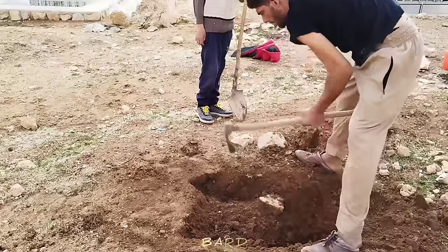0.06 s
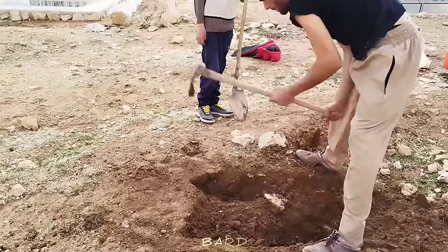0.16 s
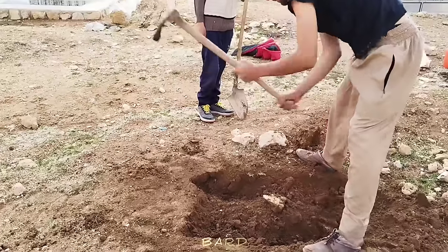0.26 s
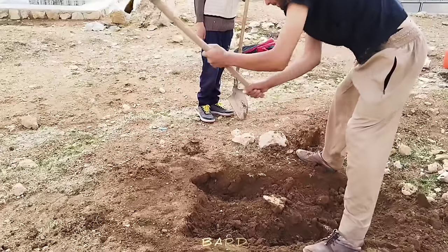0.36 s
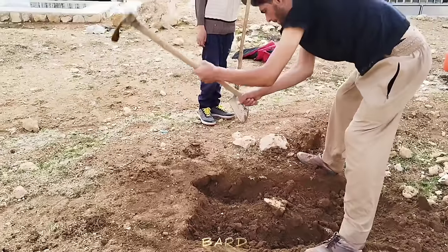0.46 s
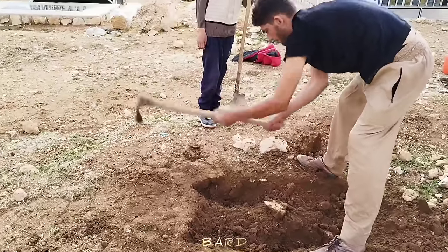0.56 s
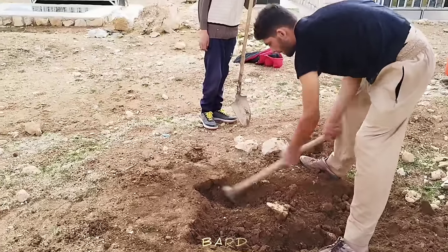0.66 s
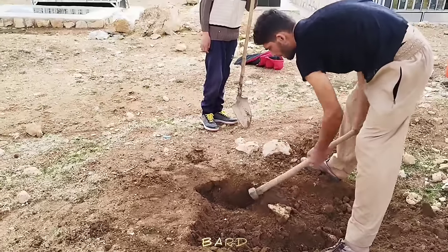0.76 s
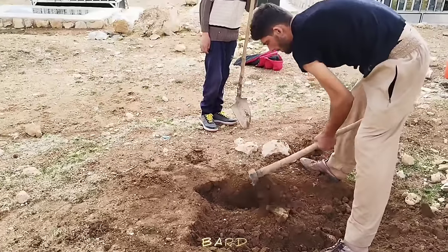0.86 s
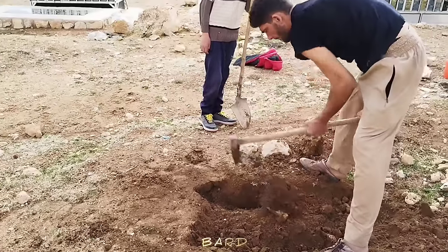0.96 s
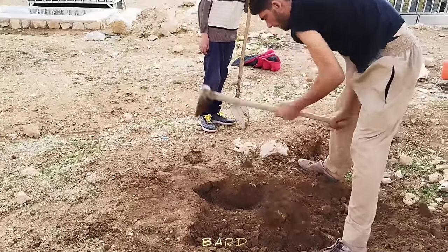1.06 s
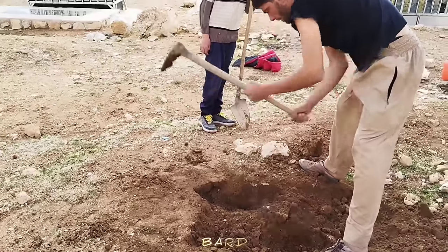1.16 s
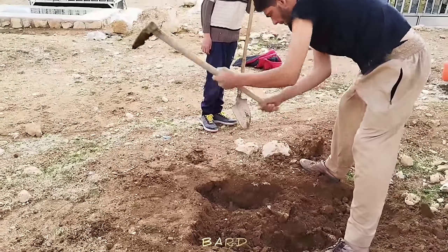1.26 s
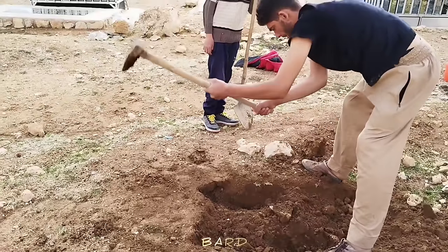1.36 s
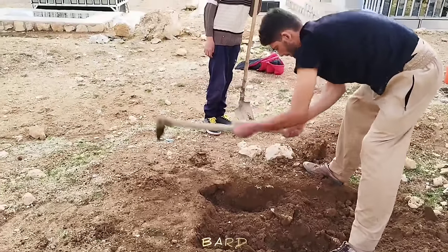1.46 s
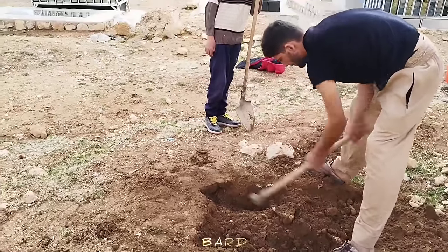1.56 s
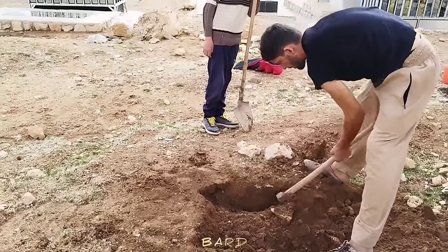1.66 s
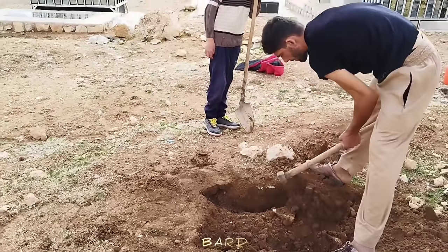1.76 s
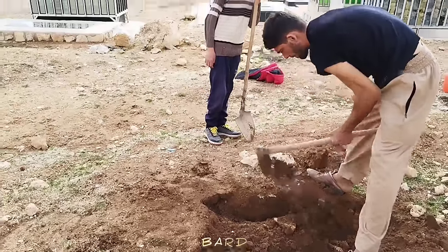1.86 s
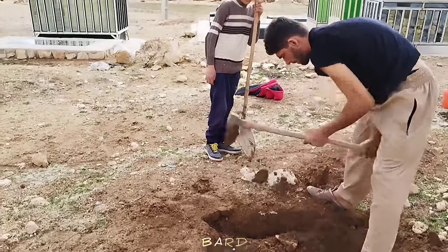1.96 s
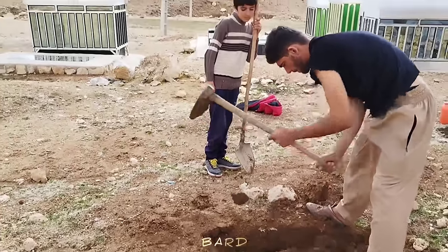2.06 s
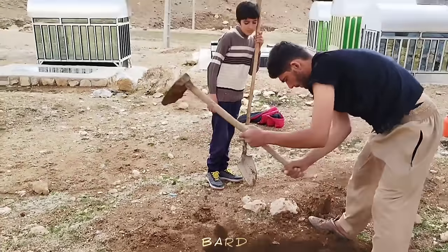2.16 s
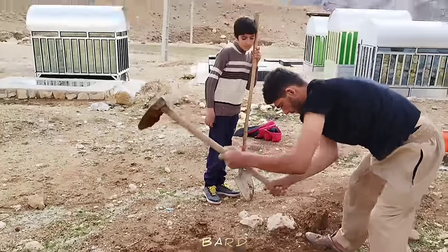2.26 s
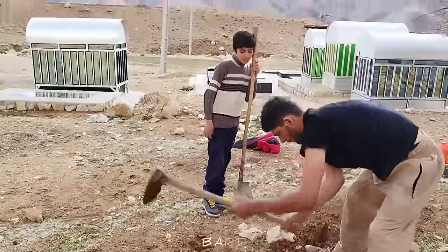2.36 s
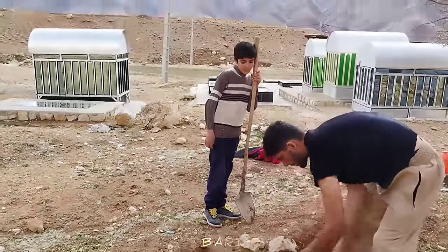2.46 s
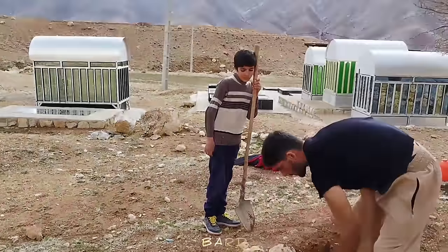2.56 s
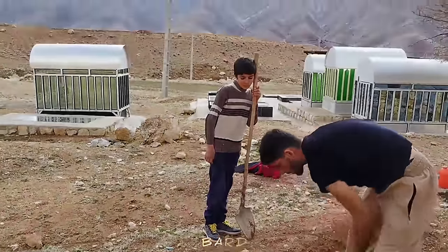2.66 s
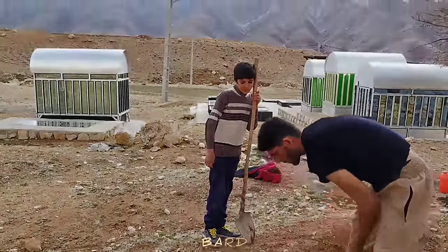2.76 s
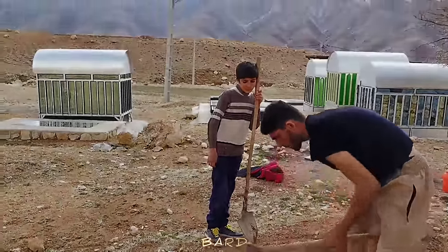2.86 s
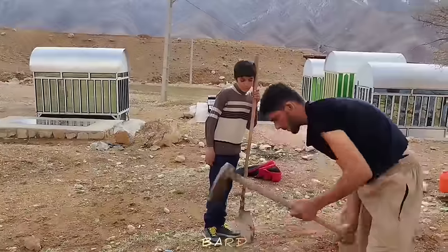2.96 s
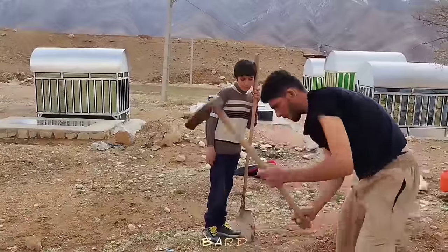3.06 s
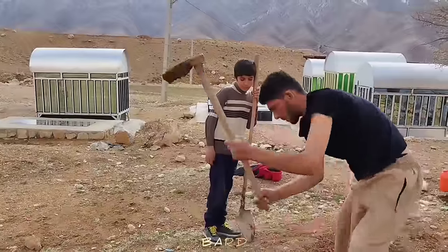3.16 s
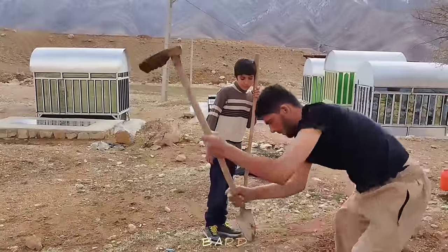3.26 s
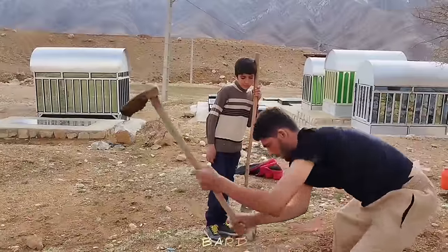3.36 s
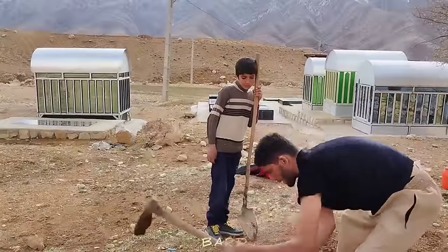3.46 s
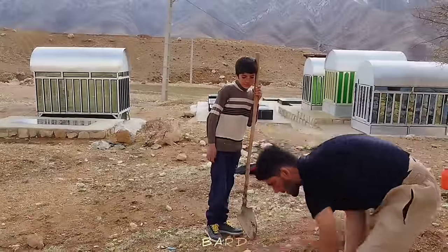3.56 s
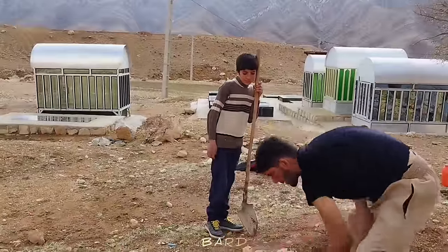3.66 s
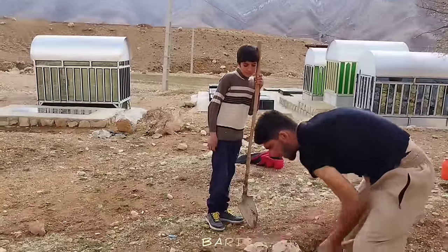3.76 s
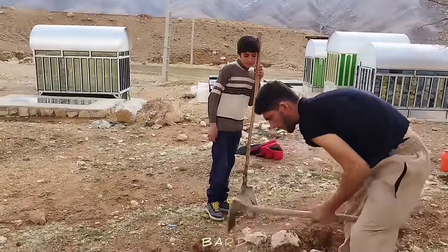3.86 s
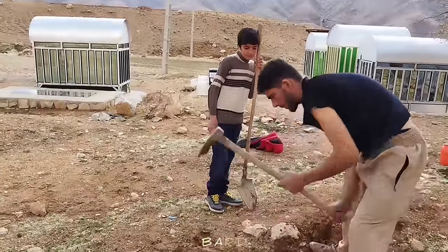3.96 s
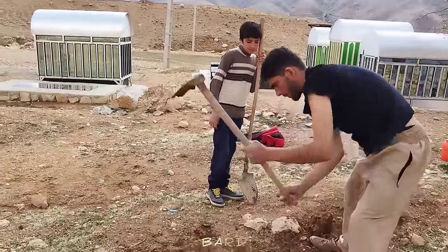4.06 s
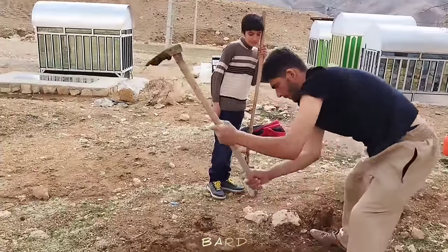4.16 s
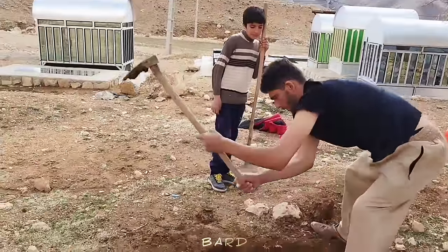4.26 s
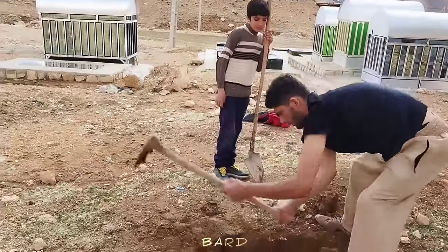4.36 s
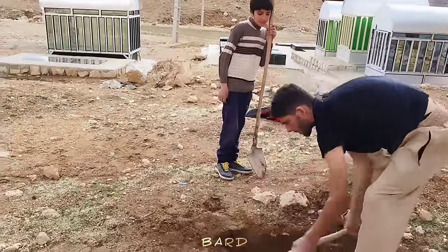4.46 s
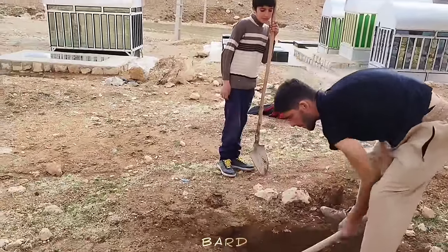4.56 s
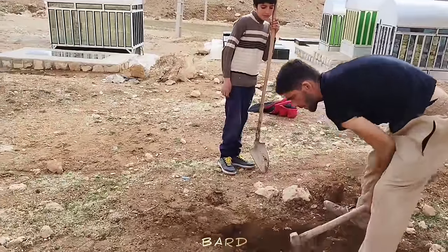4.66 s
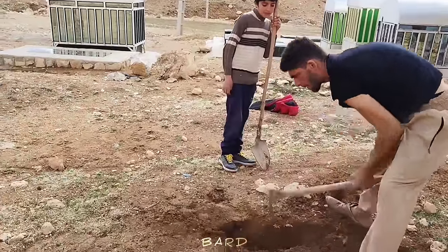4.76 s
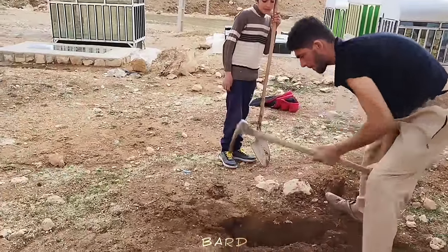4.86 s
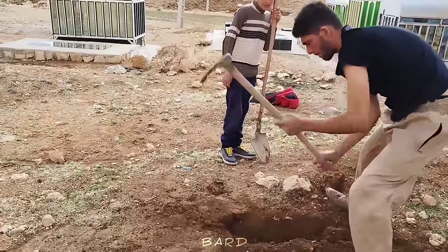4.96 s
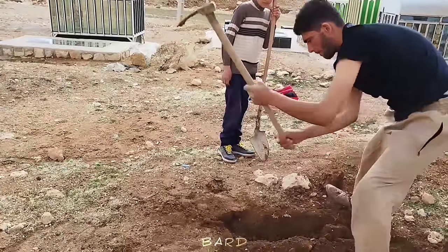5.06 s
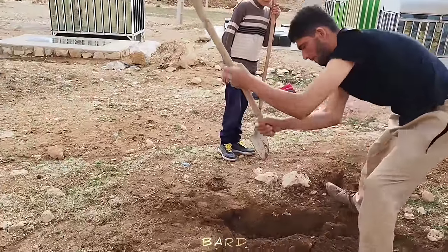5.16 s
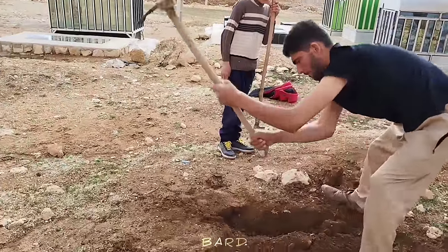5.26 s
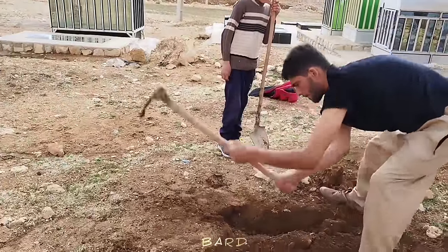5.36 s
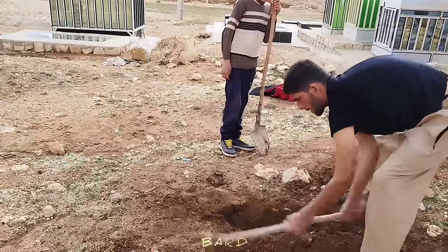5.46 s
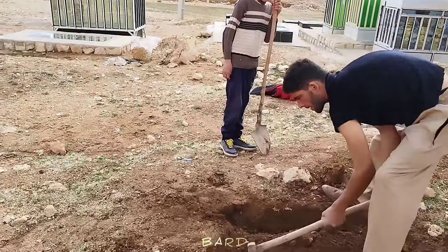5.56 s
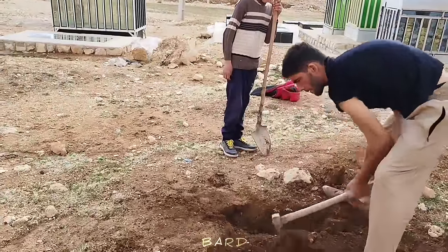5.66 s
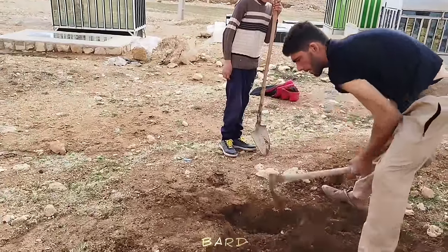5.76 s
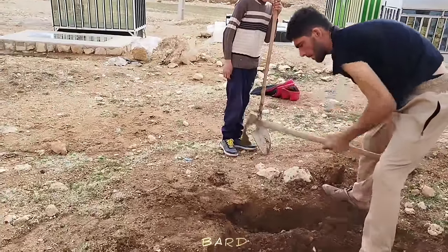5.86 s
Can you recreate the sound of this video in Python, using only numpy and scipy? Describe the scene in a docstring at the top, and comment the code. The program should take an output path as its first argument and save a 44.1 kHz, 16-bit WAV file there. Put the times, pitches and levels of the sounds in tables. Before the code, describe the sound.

Steel strikes dry, stony ground six times at a steady working pace, starting soft and growing harder and brighter. Each hit is a dense cluster of crunch, thud and stone knock, quickly damped. Sharp pebble-like clicks snap at the right, with a few clods knocking and faint soil rustle. Open outdoor space, hardly any echo; low wind flutters, mostly in the right channel.

```python
"""In open country, a few steps away, a man swings a pickaxe into dry, stony earth six times.
Each blow mixes crunching grains of noise with ringing knocks on stones, a thud and pattering soil.
Between blows, filtered snaps make sharp little clicks close by on the right, and small faint ticks.
A far hush and a light wind that buffets the microphone are made of coloured noise."""
import sys
import numpy as np
from scipy import signal
from scipy.fft import rfft, irfft
from scipy.io import wavfile
from scipy.ndimage import uniform_filter1d

SR = 44100
rng = np.random.default_rng(int(sys.argv[2]) if len(sys.argv) > 2 else 0)


def inscribe(sig):
    """Save sig as 16-bit PCM at rate SR to the path in sys.argv[1].

    A 1-D sig is mono; a 2-D sig holds one channel per row.
    Samples are clipped to [-1, 1] before scaling.
    """
    pcm = np.round(np.clip(np.atleast_2d(sig).T, -1, 1) * 32767)
    wavfile.write(sys.argv[1], SR, pcm.astype(np.int16))


N = 259881
TIME = np.arange(N) / SR
FREQ = np.linspace(0, SR / 2, 4097)

# Far hush. Each row: frequency in Hz, level in dB per Hz.
HUSH_COLOUR = [(88, -28.5), (150, -2), (226, -7.5), (354, -9), (391, -13.5), (484, -15), (689, -16),
               (1260, -24.5), (1900, -27), (2870, -30.5), (3100, -31.5), (7320, -38), (8560, -39.5),
               (16000, -44.5)]
# The hush swells and sinks a little. Each row: time in seconds, level in dB.
HUSH_LEVEL = [(0, -61.5), (1.4, -61.5), (3.3, -60.5), (5.89, -61)]
HUSH_WAVER_DB = 0.7
# Light breeze at the two microphone ports. Each row: time in seconds, left level in dB, right level in dB.
BREEZE_LEVEL = [(0.0, -41, -40), (0.45, -43.5, -45), (0.6, -45.5, -45), (0.9, -42, -39.5),
                (1.2, -40.5, -44.5), (1.45, -46.5, -48.5), (2.398, -50.5, -51), (2.7, -45, -49),
                (2.849, -53, -49.5), (3.2, -45, -40), (3.6, -42.5, -44.5), (3.9, -50.5, -50),
                (4.3, -48, -47.5), (4.7, -50, -49), (5.0, -54, -33.5), (5.35, -48.5, -45),
                (5.6, -31.5, -34), (5.89, -31.5, -35.5)]
# Rumble of the breeze. Each row: frequency in Hz, level in dB per Hz.
BREEZE_COLOUR = [(12, 9.5), (30, 4), (60, -3.5), (110, -9), (180, -21.5), (300, -32.5), (700, -60),
                 (4000, -110)]
# Single gusts. Each row: middle in seconds, length in seconds, level in dB, flutter in Hz,
# left minus right in dB.
GUSTS = [(0.695, 0.062, -28, 55.4, -29), (0.774, 0.0685, -28, 60.4, -26), (0.93, 0.19, -36.5, 53.5, 10),
         (1.059, 0.27, -38.5, 54, -6), (2.514, 0.071, -31, 60.6, -24), (2.62, 0.072, -35.5, 34.3, 0.5),
         (2.986, 0.26, -39.5, 55.4, -12), (3.135, 0.11, -33.5, 42, -20), (3.28, 0.069, -42.5, 44, 0),
         (3.404, 0.082, -36, 49, 18), (3.499, 0.076, -39.5, 43, -11), (4.188, 0.054, -33, 33.8, -27),
         (4.809, 0.085, -32.5, 45.5, -9), (4.898, 0.079, -24.5, 71, -19), (4.992, 0.13, -24, 86.6, -24),
         (5.108, 0.0686, -29.5, 54.3, -22), (5.161, 0.091, -23, 44, -27), (5.279, 0.1, -34.5, 55.3, -15),
         (5.419, 0.032, -31.5, 56.5, 17), (5.636, 0.12, -29, 52, 8.5), (5.752, 0.064, -24.5, 75, -1),
         (5.808, 0.079, -26.5, 71.5, 6), (5.861, 0.07, -25, 84, -12)]
# Colour of a gust. Each row: multiple of its flutter rate, level in dB per Hz.
GUST_COLOUR = [(0.2, -5.5), (0.6, -1.5), (1, 0.5), (1.7, -5.5), (3, -22.5), (7, -61), (30, -100)]

# Pebble-like clicks close by. Each row: start in seconds, level in dB, chatter decay in seconds
# (before the chatter is shortened), lowest pitch in Hz, stony body in dB (before a small offset),
# highest treble in dB.
CLICKS = [(0.3064, -16, 0.018, 2620, 8, -0.5), (0.8614, -12.5, 0.024, 2930, 8, -3),
          (2.0827, -7.5, 0.016, 1860, 1.5, -11), (4.0920, -9, 0.027, 1780, -2, -10),
          (4.892, -9, 0.019, 2120, 4, -6)]
# Each row: frequency in Hz, level in dB per Hz.
CLICK_COLOUR = [(1400, -11.5), (2200, -6.5), (3300, -9), (3850, -3), (4600, -4), (5400, -0.5), (7100, 2.5),
                (8300, -5), (9500, 0), (10800, -10.5), (15300, -8.5), (16500, -15)]

# Small faint ticks: some are crumbs and pebbles, some follow a click by about a tenth of a second.
# Each row: start in seconds, level in dB, pitch in Hz.
FAINT_TICKS = [(0.414, -40, 5160), (1.179, -39, 7240), (2.1872, -34, 7500), (2.271, -40.5, 7300),
               (2.650, -35.5, 7000), (2.813, -36.5, 6300), (2.875, -40, 6950), (3.429, -39, 5600),
               (3.984, -38, 6800), (4.004, -35, 7100), (4.192, -34, 7200), (4.629, -28.5, 5240),
               (4.7552, -22, 7070), (4.808, -32, 6800), (4.9882, -38.5, 6840), (5.139, -39.5, 4200),
               (5.3536, -32.5, 7200), (5.6538, -40, 4800), (5.7293, -24.5, 7100), (5.816, -40, 5370),
               (5.863, -24.5, 6500), (5.875, -36, 7000), (5.8845, -33, 3970)]
# Colour of a tick. Each row: multiple of its pitch, level in dB per Hz.
TICK_COLOUR = [(0.06, -36), (0.25, -37), (0.45, -9), (0.7, -8.5), (1, 2.5), (1.25, -12.5), (1.6, -24),
               (2.3, -29)]
# Clods knock together. Each row: start in seconds, level in dB, treble in dB.
CLODS = [(0.0450, -34.5, 17.5), (3.7932, -35, -32), (3.93, -15, -28), (3.964, -35.5, -2), (4.544, -21, -10),
         (4.553, -33, 2)]
# Each row: frequency in Hz, level in dB per Hz.
CLOD_COLOUR = [(200, 2), (600, 10), (1300, 12.5), (2400, 10.5), (4200, 10), (7000, -5.5), (10000, -24),
               (16000, -46)]

# Shoes and clothes rub over the soil as the pick is raised and brought down. Each row:
# middle in seconds, length in seconds, level in dB.
SHUFFLES = [(0.16, 0.063, -70), (0.39, 0.053, -67), (1.3, 0.21, -68.5), (1.53, 0.14, -87), (2.3, 0.33, -74),
            (2.77, 0.13, -65.5), (3.06, 0.027, -63), (3.32, 0.33, -69), (3.49, 0.038, -60),
            (3.54, 0.06, -72), (4.0, 0.17, -66.5), (4.42, 0.12, -86), (4.84, 0.77, -67.5),
            (5.46, 0.15, -65), (5.86, 0.11, -61)]
# Fine soil. Each row: frequency in Hz, level in dB per Hz.
SOIL_COLOUR = [(150, 8.5), (600, 5.5), (1600, -9), (2800, -11.5), (4400, -5), (5800, -8), (7500, -2.5),
               (11000, -48.5), (16000, -27)]
# Soil trickles from each knocked clod: length, level against the knock.
TRICKLE_S, TRICKLE_DB = 0.038, -45
# Thrown soil comes down in a shower: deepest point to its middle, length, level against the throw.
SHOWER_AFTER_S, SHOWER_S, SHOWER_DB = 0.066, 0.039, -21.5
# The blade is drawn out after each blow: deepest point to the middle of the scrape, scrape length.
DRAW_OUT_AFTER_S, DRAW_OUT_S = 0.2, 0.27
# The scraped blade sings: pitch, width.
SING_HZ, SING_WIDTH_HZ = 4030, 600

# The pick goes in. Each row: first touch in seconds, deepest point in seconds, crunch in dB,
# crunch at the surface against full depth in dB, brightness in dB, thrown soil in dB,
# ground ring in Hz, ring in dB, scrape on the way out in dB, blade singing in that scrape in dB.
BLOWS = [(0.7022, 0.719, -27, -12, 0.5, -78, 554, -26, -100, -95),
         (1.604, 1.623, -30.5, -14, 1.5, -58, 357, -19.5, -65.5, -65),
         (2.557, 2.572, -39, -2, 0, -62.5, 273, -42, -70, -77),
         (3.603, 3.621, -30.5, -12, 3, -59, 326, -34.5, -76, -92),
         (4.4928, 4.511, -28.5, -17.5, 3, -46, 710, -27, -75, -79),
         (5.5082, 5.538, -31.5, -7.5, 9, -53.5, 195, -14, -67, -77)]
# Crunching gravel. Each row: frequency in Hz, level in dB per Hz.
GRAVEL_COLOUR = [(60, -27.5), (200, 14.5), (340, -9.5), (450, -7), (600, 5.5), (1100, -13.5), (1550, -2.5),
                 (2500, -13.5), (4300, -3.5), (5500, -12.5), (7200, -7.5), (10500, -38), (16000, -42.5)]
# The steel meets a large stone. Each row: start in seconds, thud in dB, punch in dB, knock in dB,
# crack in dB, thud pitch in Hz, knock pitch in Hz.
STONES = [(0.7047, -31, -35, -56, -50, 294, 1300), (0.7077, -39, -43, -49, -21, 214, 1720),
          (0.7118, -41, -45, -55, -31, 140, 1700), (0.7148, -35, -33, -49, -27, 210, 1640),
          (0.7181, -27, -27, -42, -25, 215, 1690), (0.7224, -26.5, -33, -36, -37, 207, 1580),
          (1.607, -35, -57, -60, -32, 204, 1520), (1.617, -29, -24, -59, -42, 170, 1400),
          (1.621, -48, -36, -32, -20.5, 210, 1760), (1.6241, -22.5, -15, -19, -19, 214, 1482),
          (1.6591, -35.5, -36, -42, -49, 190, 1800), (2.5574, -39, -48, -46, -57, 150, 1340),
          (2.561, -32.5, -28, -56, -57, 140, 1500), (2.5693, -32, -35.5, -35.5, -27.5, 159, 1445),
          (2.587, -35, -31.5, -47, -38.5, 200, 1430), (3.5958, -39, -26.5, -27, -21, 171, 1104),
          (3.6107, -51, -24, -36, -37, 166, 1310), (3.617, -20.5, -10.5, -28, -13.5, 154, 1195),
          (3.6224, -45, -27, -28.5, -23.5, 157, 1380), (4.4942, -27, -17.5, -46, -14.5, 146, 1220),
          (4.507, -23.5, -24, -19.5, -11, 154, 1237), (4.5103, -26.5, -26, -23, -18.5, 166, 1080),
          (4.5168, -21.5, -11.5, -18, -16, 132, 1430), (4.527, -26, -27, -39, -43.5, 125, 1510),
          (5.521, -32, -23.5, -11, -10, 188, 1464), (5.5277, -51, -40, -39, -13, 190, 1380),
          (5.5385, -17.5, -12.5, -18, -8.5, 187, 1450), (5.5451, -26.5, -15, -23, -39, 193, 1470)]
# Earth, handle and blade, damped by the soil. Each row: frequency in Hz (thud and knock modes are
# shifted together to the contact's pitch), level in dB (within its group), 60 dB decay in seconds.
THUD_MODES = [(77.6, -14, 0.03), (191.8, 5, 0.014), (333, -4, 0.026)]
KNOCK_MODES = [(530, 5.5, 0.0047), (763, -4.5, 0.01), (956, -9.5, 0.018), (1391, 6.5, 0.01),
               (1870, -1.5, 0.0071), (2290, -7, 0.033)]
CRACK_MODES = [(3070, -7, 0.0088), (3630, -2, 0.0087), (4490, 1.5, 0.0071), (5020, -1.5, 0.0037),
               (7570, -12, 0.006), (9900, -33.5, 0.0018), (12240, -23, 0.0034)]
# Small stones along the blade's way: levels against the blow's crunch, scatter of that level.
PEBBLE_THUD_DB, PEBBLE_PUNCH_DB, PEBBLE_KNOCK_DB, PEBBLE_CRACK_DB = -5, -32, -8.5, -17.5
PEBBLE_SPREAD_DB = 5.5
# Their pitches, before each pebble's random shift.
PEBBLE_THUD_HZ, PEBBLE_KNOCK_HZ = 190, 1310
# The sudden stop of the steel pushes out one short pressure pulse: time to its peak.
PUNCH_S = 0.00026
# The stone chips as the steel cracks against it: level against the crack, 60 dB decay.
CHIP_DB, CHIP_T60_S = -1, 0.026
# Each row: frequency in Hz, level in dB per Hz.
CHIP_COLOUR = [(500, -26), (1800, -1.5), (2900, -2), (5800, -7.5), (9300, -1.5), (11000, -11.5),
               (16000, -36.5)]

# A bounce off the ground cancels a narrow band of the digging. Each row: frequency in Hz, level in dB.
GROUND_DIP = [(370, 0), (450, -8), (540, 0)]
# The left port is shaded from the work. Each row: frequency in Hz, left level in dB.
LEFT_SHADE = [(200, -0.5), (700, -1), (1300, -3), (2400, -3), (4400, -12), (8000, -24), (12000, -11.5),
              (15000, -9)]
# The left port hears the work and the clicks this much later.
WORK_LAG_S, CLICK_LAG_S = 2.3e-5, 3.2e-4
CUTOFF_HZ = 16300


def from_db(db):
    """Turn decibels into a gain."""
    return 10 ** (np.asarray(db) / 20)


def rms_one(x):
    """Scale to an rms (average strength) of 1."""
    return x / np.sqrt(np.mean(x ** 2) + 1e-20)


def over_freq(points):
    """Join (Hz, value) points on a log-frequency axis."""
    hz, value = np.transpose(points)
    return np.interp(np.log(FREQ + 1), np.log(hz), value)


def colour(x, points, keep_power=True):
    """Filter to the given spectrum, reacting as early as possible (minimum phase)."""
    gain = from_db(over_freq(points))
    cepstrum = irfft(np.log(rms_one(gain) if keep_power else gain))
    # folding the cepstrum forward makes the filter minimum-phase
    cepstrum[1:len(FREQ) - 1] *= 2
    cepstrum[len(FREQ):] = 0
    response = irfft(np.exp(rfft(cepstrum)))
    return signal.oaconvolve(x, response)[:N]


def pass_band(x, order, hz, kind="low"):
    """Keep what lies below (low) or above (high) a frequency, with a smooth slope."""
    return signal.sosfilt(signal.butter(order, hz, kind, fs=SR, output="sos"), x)


def resonate(x, hz, width_hz):
    """Ring at one resonance; rms 1."""
    return rms_one(signal.lfilter(*signal.iirpeak(hz, hz / width_hz, fs=SR), x + 1e-18))


def delayed(x, seconds):
    """Play a signal later."""
    return np.interp(TIME - seconds, TIME, x, left=0)


def add(out, s, sound):
    """Lay a sound into the track at time s."""
    room = out[round(s * SR):][:len(sound)]
    room += sound[:len(room)]


def wander(per_s):
    """Join random points by lines, with a spread of about 1; hold the last once all 2000 are used."""
    knots = rng.standard_normal(2000)
    return 1.2 * np.interp(TIME * per_s, np.arange(len(knots)), knots)


def grains(per_s, spread_db):
    """Scatter tiny random fractures of uneven size; rms 1."""
    sizes = rng.exponential(1, N)
    signs = np.sign(rng.random(N) - 0.5)
    born = rng.random(N) < per_s / SR
    out = np.zeros(N)
    out[born] = from_db(spread_db * np.minimum(sizes[born], 3)) * signs[born]
    return rms_one(out)


def snap(db, t60, grit):
    """One push followed by a short rattle of micro-slips; db sets the energy of the whole."""
    t = TIME[:SR // 30]
    burst = rng.standard_normal(len(t)) * from_db(-60 * t / t60)
    burst *= grit / np.linalg.norm(burst)
    burst[0] = 1
    return from_db(db) * burst / np.linalg.norm(burst)


def strike(modes, db, push, pitch=1):
    """A push sets damped modes ringing, with a peak of the given level."""
    t = TIME[:SR // 12]
    response = np.zeros(len(t))
    for k, (hz, level, t60) in enumerate(modes):
        sign = (-1) ** k
        response += sign * from_db(level - 60 * t / t60) * np.sin(2 * np.pi * hz * pitch * t)
    sound = signal.fftconvolve(push, response)
    return from_db(db) * sound / np.abs(sound).max()


def open_air(shared_hz=500, left_treble_db=-4, right_treble_db=2):
    """Far hush of the countryside: noise whose low part alone is partly alike at both ports."""
    common, *own = rng.standard_normal((3, N))
    sides = []
    for noise, treble_db in zip(own, (left_treble_db, right_treble_db)):
        mixed = noise + pass_band(0.49 * common - 0.74 * noise, 1, shared_hz)
        tilt = [(2000, 0.023), (7500, treble_db), (15000, 0)]
        sides.append(colour(colour(mixed, HUSH_COLOUR), tilt, False))
    level_db = np.interp(TIME, *np.transpose(HUSH_LEVEL)) + HUSH_WAVER_DB * wander(per_s=22)
    return from_db(level_db) * np.array(sides)


def wind(level_db, lumps_db=3):
    """The breeze rumbles at one port: low noise, evened out, then swelling in slow lumps."""
    eddies = colour(rng.standard_normal(N), BREEZE_COLOUR)
    even = eddies / np.sqrt(uniform_filter1d(eddies ** 2, SR // 8))
    return from_db(level_db + lumps_db * wander(per_s=16)) * even


def gusts():
    """Each gust is a short swell of eddies fluttering around its own rate, mostly at one port."""
    out = np.zeros((2, N))
    for middle, length, db, flutter_hz, pan_db in GUSTS:
        swell = np.hanning(round(length * SR))
        gust_colour = [(k * flutter_hz, level) for k, level in GUST_COLOUR]
        for port, shelter_db in zip(out, (min(pan_db, 0), min(-pan_db, 0))):
            eddies = colour(rng.standard_normal(SR // 2), gust_colour)
            eddies = eddies[SR // 8:][:len(swell)]  # skip the filter's start
            gust = rms_one(swell * eddies) * np.sqrt(np.mean(swell ** 2))
            add(port, middle - length / 2, from_db(db + shelter_db) * gust)
    return out


def near_clicks(rattle_db=-7, bounce=0.3):
    """Hard clicks with a chatter and a near bounce; also plain clicks that feed the echoes."""
    direct, spread = np.zeros((2, N))
    for s, db, t60, lowest_hz, body_db, top_db in CLICKS:
        click = snap(db, t60=0.0016, grit=1.0) + snap(db + rattle_db, t60=0.84 * t60, grit=2.5)
        stony = [(2400, 0.69), (3300, body_db + 1.0), (4000, -2.55), (4600, body_db / 2),
                 (6500, 1), (9000, -0.26), (12000, top_db)]
        click = colour(pass_band(click, 4, lowest_hz, "high"), stony, False)
        add(direct, s, click)
        # a weaker copy within a millisecond notches the spectrum
        add(direct, s + rng.uniform(0.0004, 0.001), bounce * click)
        # without grit only the first push is left
        add(spread, s, pass_band(snap(db, t60=t60, grit=0), 4, lowest_hz, "high"))
    return colour(direct, CLICK_COLOUR), colour(spread, CLICK_COLOUR)


def ticks_and_clods():
    """Small faint ticks are snaps, each at its own pitch; clods knock with their own treble."""
    ticks, clods = np.zeros((2, N))
    for s, db, hz in FAINT_TICKS:
        tick_colour = [(k * hz, level) for k, level in TICK_COLOUR]
        add(ticks, s, colour(snap(db, t60=0.011, grit=0.5), tick_colour))
    for s, db, treble_db in CLODS:
        knock = snap(db, t60=0.035, grit=0.21)
        body = pass_band(knock, 1, 2500)
        add(clods, s, body + from_db(treble_db) * (knock - body))
    return ticks + colour(clods, CLOD_COLOUR)


def loose_soil(settle_t60=0.61, clump_db=3, coarse_db=-6):
    """Soil rubbed, thrown, scraped or shed by clods patters in clumps of fine and coarse grains."""
    power, t = np.zeros(N), TIME[:SR // 2]
    rustles = list(SHUFFLES)
    for s, db, _ in CLODS:
        rustles.append((s + TRICKLE_S / 2, TRICKLE_S, db + TRICKLE_DB))
    for _, deepest, _, _, _, soil_db, _, _, scrape_db, _ in BLOWS:
        add(power, deepest, from_db(soil_db - 60 * t / settle_t60) ** 2)
        rustles.append((deepest + SHOWER_AFTER_S, SHOWER_S, soil_db + SHOWER_DB))
        rustles.append((deepest + DRAW_OUT_AFTER_S, DRAW_OUT_S, scrape_db))
    for middle, length, db in rustles:
        swell = np.hanning(round(length * SR))
        add(power, max(middle - length / 2, 0), from_db(db) ** 2 * swell)
    clumped = grains(per_s=1500, spread_db=3.5) * from_db(clump_db * wander(per_s=74))
    fine = colour(rms_one(clumped), SOIL_COLOUR)
    # coarse grains ring at nine pitches
    coarse = sum(resonate(grains(per_s=90, spread_db=3.5), hz, hz / 5)
                 for hz in np.geomspace(1300, 7500, 9))
    return np.sqrt(power) * rms_one(fine + from_db(coarse_db) * rms_one(coarse))


def singing_blade(length_s=0.13):
    """Grit rubs the steel on its way out and makes it sing faintly: grains through a resonance."""
    rub = np.zeros(N)
    for _, deepest, *_, sing_db in BLOWS:
        start = deepest + DRAW_OUT_AFTER_S - length_s / 2
        add(rub, start, from_db(sing_db) * np.hanning(round(length_s * SR)))
    return rub * resonate(grains(per_s=900, spread_db=4), SING_HZ, SING_WIDTH_HZ)


def digging(stop_t60=0.042, slip_db=6, crumble_db=-17, crumble_t60=0.11):
    """Gravel crunches harder until the blade stops and the ground rings; its edge crumbles on."""
    slipping = grains(per_s=2200, spread_db=5) * from_db(slip_db * wander(per_s=400))
    gravel = colour(slipping, GRAVEL_COLOUR)
    gravel = gravel / np.sqrt(uniform_filter1d(gravel ** 2, SR // 30) + 1e-9)  # even out the level
    treble = pass_band(gravel, 1, 2500, "high")
    out = np.zeros(N)
    for touch, deepest, crunch_db, surface_db, bright_db, _, ring_hz, ring_db, *_ in BLOWS:
        start = round(touch * SR)
        span = slice(start, start + SR // 8)
        after = np.maximum(TIME[span] - deepest, 0)
        release_db = np.maximum(-60 * after / stop_t60, crumble_db - 60 * after / crumble_t60)
        depth_db = np.interp(TIME[span], [touch, deepest], [surface_db, 0])
        force = from_db(crunch_db + depth_db + release_db)
        add(out, touch, force * (gravel[span] + (from_db(bright_db) - 1) * treble[span]))
        add(out, deepest, strike([(ring_hz, 0, 0.035)], ring_db, push=[1]))
    return out


def chip(db):
    """A brief, toneless burst of splitting stone."""
    return colour(snap(db, t60=CHIP_T60_S, grit=1.4), CHIP_COLOUR)[:SR // 12]


def contact(thud_db, punch_db, knock_db, crack_db, thud_hz, knock_hz):
    """One contact shakes the earth, punches the air, knocks at the stone's pitch and cracks on steel."""
    firm, gritty = snap(0, t60=0.008, grit=0.4), snap(0, t60=0.006, grit=1)
    rings = strike(CRACK_MODES, crack_db, gritty)
    for modes, db, hz in (THUD_MODES, thud_db, thud_hz), (KNOCK_MODES, knock_db, knock_hz):
        # the strongest mode lands on the wanted pitch
        strongest_hz = max(modes, key=lambda mode: mode[1])[0]
        add(rings, 0, strike(modes, db, firm, pitch=hz / strongest_hz))
    add(rings, 0, chip(crack_db + CHIP_DB))
    age = TIME[:len(rings)] / PUNCH_S
    punch = pass_band(age * np.exp(1 - age), 1, 120, "high")
    return rings - from_db(punch_db) * punch


def pick_contacts(count=4):
    """The blade meets varied pebbles on its way in, harder with depth; large stones stand out."""
    out = np.zeros(N)
    for s, *stone in STONES:
        add(out, s, contact(*stone))
    for touch, deepest, crunch_db, surface_db, *_ in BLOWS:
        for depth in (np.arange(count) + rng.random(count)) / count:
            pitch = rng.uniform(0.75, 1.3)
            pebble = contact(PEBBLE_THUD_DB, PEBBLE_PUNCH_DB, PEBBLE_KNOCK_DB, PEBBLE_CRACK_DB,
                             PEBBLE_THUD_HZ * pitch, PEBBLE_KNOCK_HZ * pitch)
            db = crunch_db + surface_db * (1 - depth) + PEBBLE_SPREAD_DB * rng.standard_normal()
            add(out, touch + (deepest - touch) * depth, from_db(db) * pebble)
    return out


def scatter(x, first_s, t60, left_db, right_db):
    """Rough ground and nearby things send back a diffuse echo, different at each port."""
    t = TIME[:round((first_s + t60) * SR)]
    late = np.maximum(t - first_s, 0)
    envelope = from_db(-60 * late / t60) * (1 - np.exp(-late / 0.0069))
    response = rng.standard_normal((2, SR))[:, :len(t)] * envelope
    response *= from_db([[left_db], [right_db]]) / np.linalg.norm(response, axis=1, keepdims=True)
    return np.array([signal.oaconvolve(x, side)[:N] for side in response])


def detour(x):
    """Treble takes small detours that vary with the spot, and lingers among clods around the hole."""
    treble = pass_band(x, 1, 1300, "high")
    # a wandering blend of two echo patterns stands for the changing spot
    spot = np.pi * wander(per_s=40)
    near = sum(scatter(treble * share, 0.0012, 0.0094, left_db=-3, right_db=-16.5)
               for share in (np.cos(spot), np.sin(spot)))
    return near + scatter(treble, 0.0022, 0.06, left_db=-16.5, right_db=-22)


def scene():
    """Digging a little to the right, clicks far right: the left port hears both later and duller."""
    times, *ports = np.transpose(BREEZE_LEVEL)
    breeze = np.array([wind(np.interp(TIME, times, port_db)) for port_db in ports])
    background = open_air() + breeze + gusts()
    clicks, spread = near_clicks()
    work = ticks_and_clods() + loose_soil() + singing_blade() + digging() + pick_contacts()
    work = colour(work, GROUND_DIP, False)
    right = work + clicks
    detours = detour(right)
    left = delayed(work, WORK_LAG_S) + delayed(clicks, CLICK_LAG_S) + detours[0]
    left = colour(left, LEFT_SHADE, False)
    # echoes of the clicks come back with their top rubbed off
    dulled = pass_band(spread, 2, 8500)
    echoes = scatter(work, 0.032, 0.15, left_db=-42.5, right_db=-31)
    echoes += scatter(dulled, 0.016, 0.15, left_db=-35, right_db=-18.5)
    return np.array([left, right + detours[1]]) + echoes + background


def record(dry):
    """Cut the top steeply above the cutoff."""
    lowpass = signal.ellip(10, 0.2, 70, CUTOFF_HZ, fs=SR, output="sos")
    return signal.sosfilt(lowpass, dry, axis=-1)


dry = scene()
out = record(dry)
inscribe(out)
```